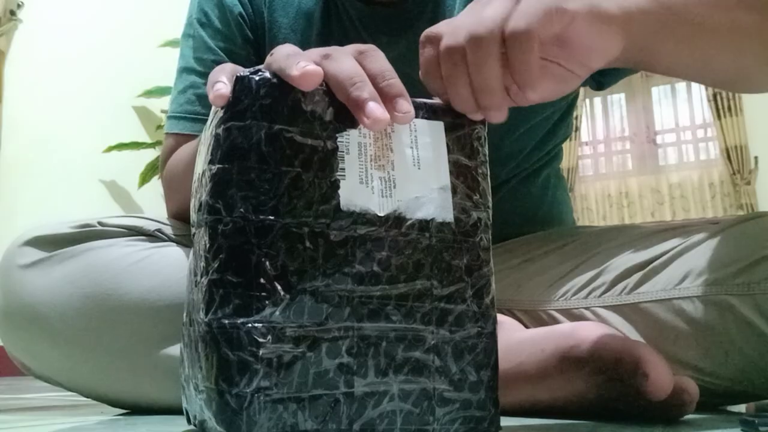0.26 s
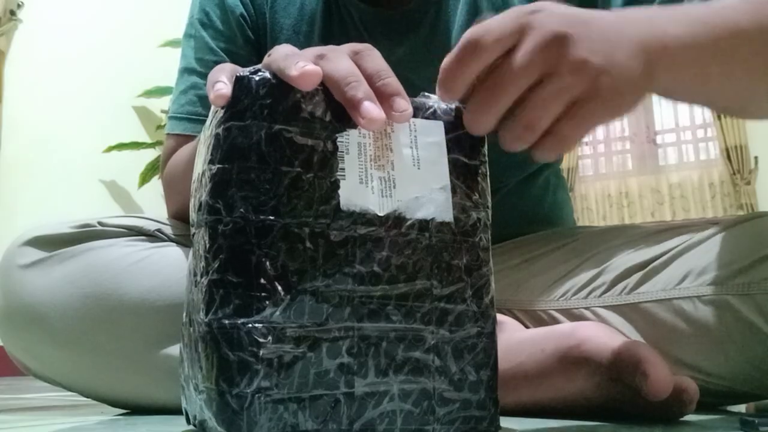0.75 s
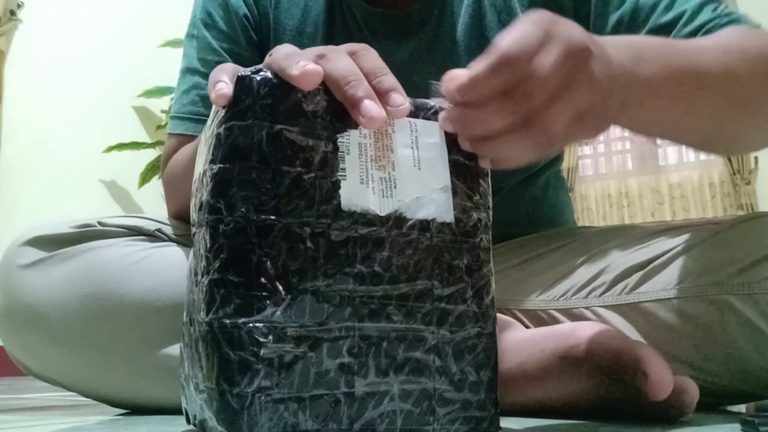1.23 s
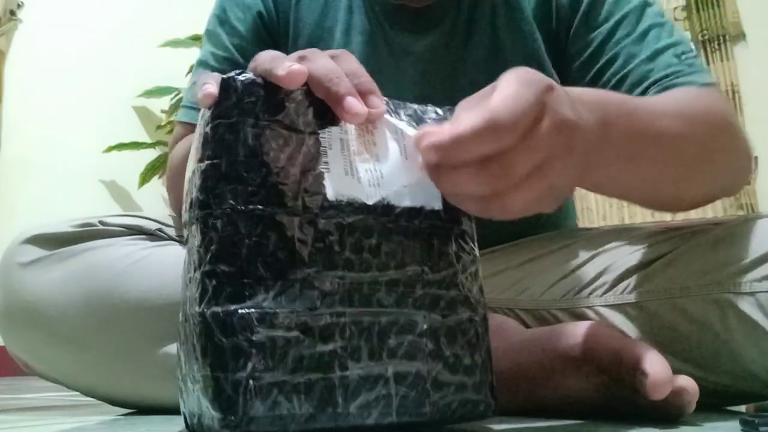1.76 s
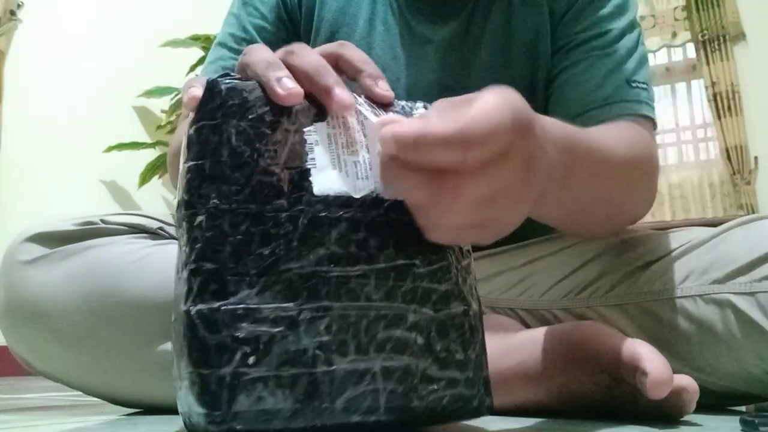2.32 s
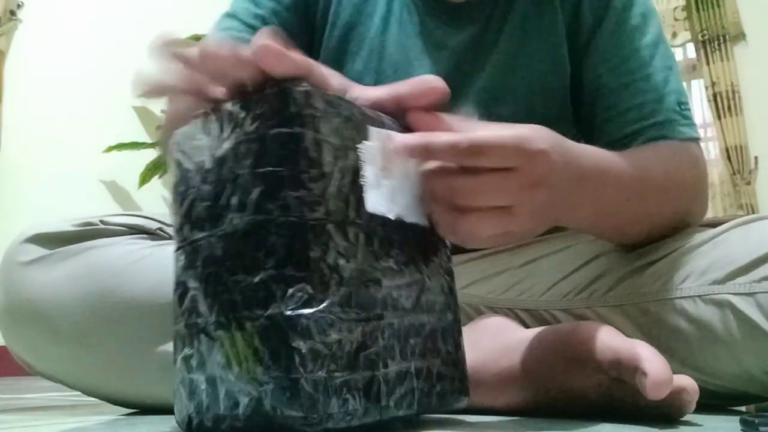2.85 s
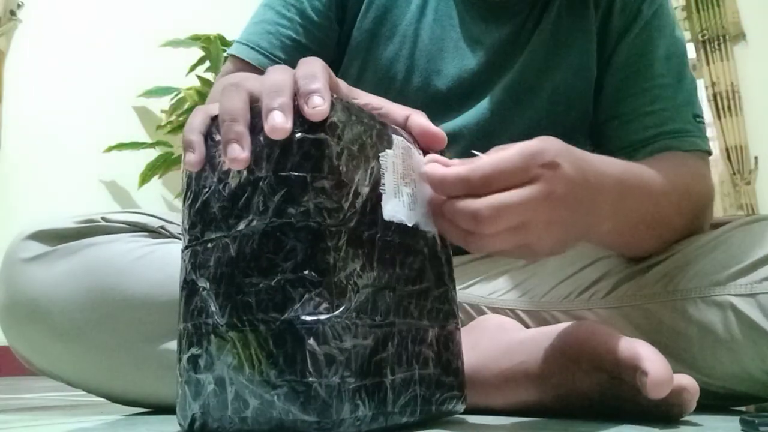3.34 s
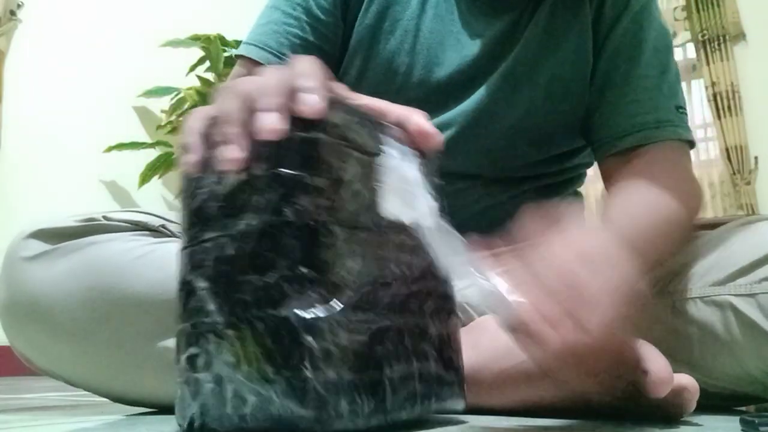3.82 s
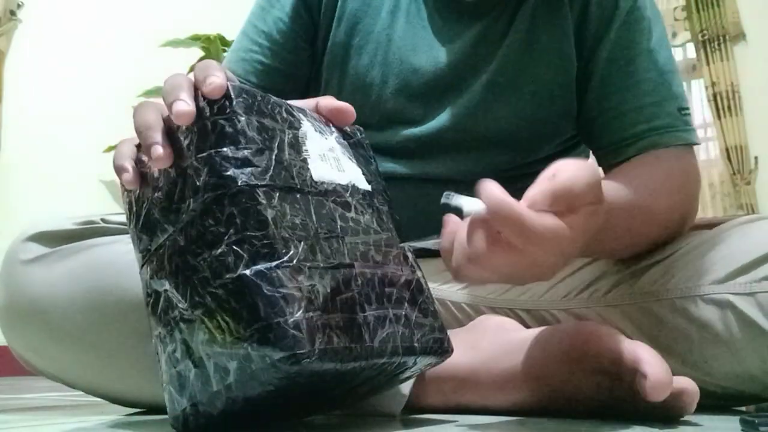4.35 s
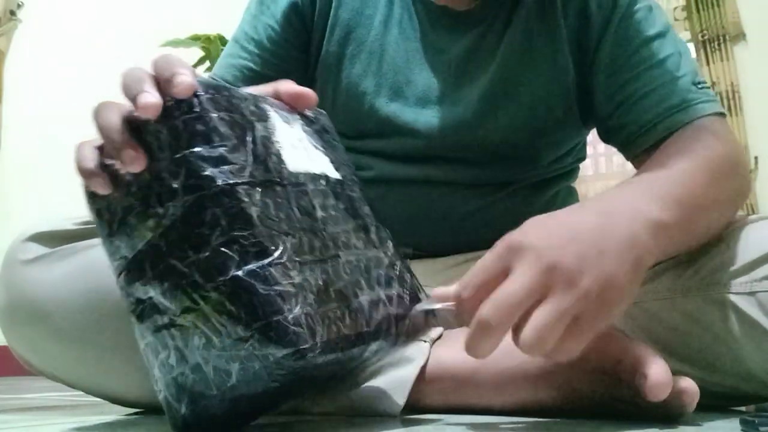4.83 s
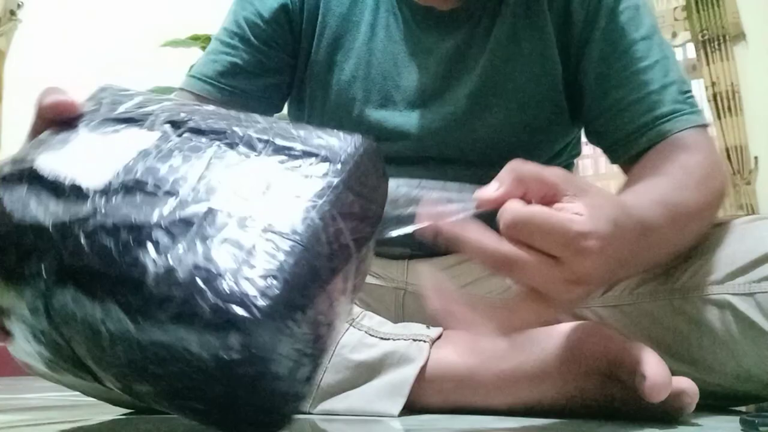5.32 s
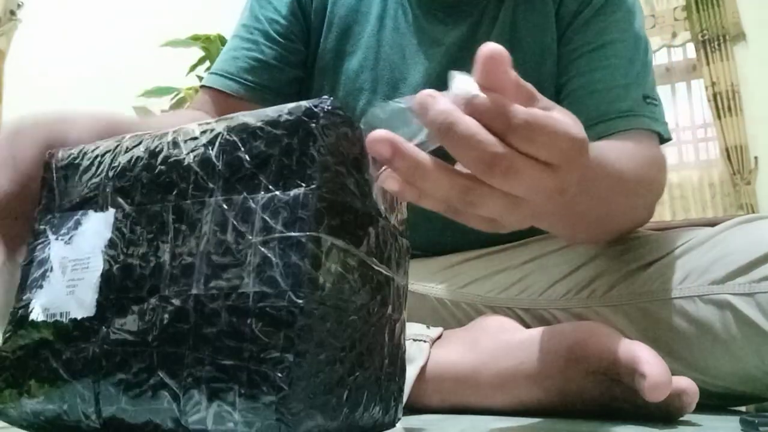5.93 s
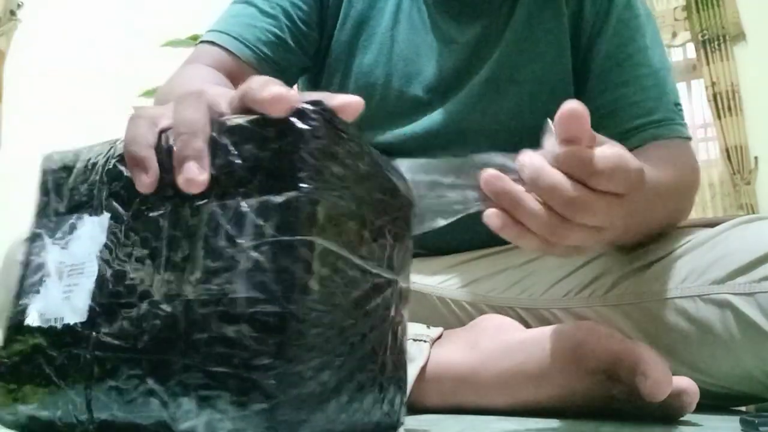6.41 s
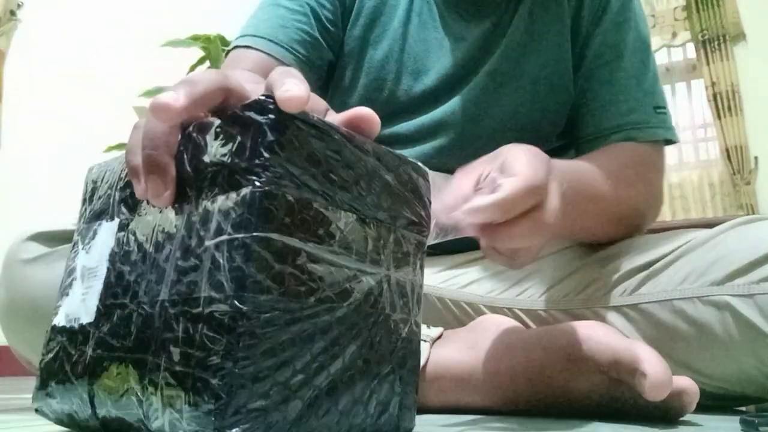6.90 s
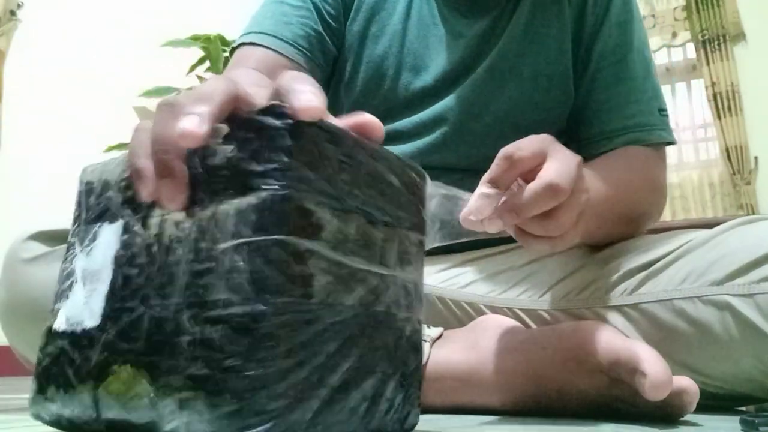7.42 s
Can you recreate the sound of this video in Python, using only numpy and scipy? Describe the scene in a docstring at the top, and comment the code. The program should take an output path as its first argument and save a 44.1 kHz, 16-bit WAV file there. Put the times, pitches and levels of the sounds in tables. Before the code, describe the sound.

A parcel wrapped in plastic film is pulled open by hand. Quiet fumbling and isolated ticks come first, then a cluster of hard snaps, a quieter stretch of rustle, a quick tape rip and a rapid stuttering run of loud cracks. Later snaps sound thicker and more crackly, with boxy thumps and a final bright rip. Close phone microphone, small reverberant room, faint low background between pulls.

```python
"""Packing tape pulled off a plastic-wrapped parcel lets go in sharp stick-slip snaps and fast rips.
Snaps are click trains through ringing film; rips are dense clicks shaped by the taut strip's resonance.
The film crinkles under the fingers (flurries of clicks), hands rub on the box, and its walls knock
hollowly (damped tones with a band of noise). A small hard-walled room adds decaying noise echoes.
A phone close by holds the loudest snaps down and hushes the pauses."""
import sys
import numpy as np
from scipy import signal
from scipy.fft import rfft, irfft
from scipy.io import wavfile
from scipy.ndimage import uniform_filter1d, minimum_filter1d

SR = 44100
rng = np.random.default_rng(int(sys.argv[2]) if len(sys.argv) > 2 else 0)


def output_pcm(signal):
    """Save a mono or channel-first signal as 16-bit PCM at the path in sys.argv[1].

    Samples are clipped to [-1, 1] before scaling.
    """
    pcm = np.clip(np.atleast_2d(signal).T, -1, 1) * 32767
    wavfile.write(sys.argv[1], SR, np.round(pcm).astype(np.int16))


N = 337802
TIME = np.arange(N) / SR  # s

# movements of the hands; start_s is when full effort is reached:
# start_s, length_s, crinkle_db, rub_db
HAND_MOVES = [(0.132, 0.24, -57, -66.5), (0.485, 0.18, -71, -60.5), (0.717, 0.018, -39, -50),
              (1.086, 0.069, -40, -54), (1.22, 0.56, -50.5, -57.5), (1.886, 0.36, -47.5, -49.5),
              (2.345, 0.15, -48.5, -60), (2.493, 0.058, -43.5, -42), (2.6, .3, -49, -56.5),
              (2.778, 0.049, -49, -55), (2.989, 0.082, -43, -37.5), (3.28, 0.81, -50, -56.5),
              (3.86, 0.38, -51, -51.5), (4.356, 0.0083, -30, -45), (4.47, 0.56, -47, -40.5),
              (5.143, 0.22, -49, -46.5), (5.442, 0.453, -47, -50.5), (5.515, 0.044, -37, -56),
              (5.88, 0.036, -43, -48.5), (6.137, 0.038, -39.5, -39.5), (6.258, 0.32, -33.5, -38),
              (6.676, .12, -44.5, -52.5), (6.84, 0.068, -42.5, -42.5), (7.022, 0.24, -50.5, -53),
              (7.385, 0.22, -36, -34.5)]
# single snaps of tape or film: start_s, level_db, brightness_db_per_octave, slip_length_ms
SINGLE_SNAPS = [(0.471, -24, 0, 1.4), (0.531, -29, 2.5, 2.2), (0.731, -50, 7, 4.5), (1.013, -45.5, 0, 8.2),
                (1.124, -30.5, -1, 2), (1.136, -31.5, 5, 6.7), (1.207, -37, 4, 2), (1.317, -18, -0.5, 1.5),
                (1.346, -25, 2.5, 3.3), (1.369, -18.5, -1, 1.4), (1.404, -30.5, -0.5, 7.2),
                (1.522, -22.5, 3, 2.9), (1.602, -11.5, -2.5, 1.2), (1.673, -31, 6, 4.9),
                (1.787, -35.5, -11, 11), (1.876, -33.5, -10, 23), (1.903, -15, 0.5, 3.4),
                (2.125, -27.5, -9.5, 22.5), (2.506, -31.5, 2, 1.5), (2.554, -24, -6, 1),
                (3.209, -22.5, 1.5, 3.1), (4.161, -38.5, -4.5, 5.6), (4.218, -29.5, 1, 4),
                (4.283, -17, 1.5, 3), (4.38, -12, 0, 1.7), (4.403, -12.5, -3, 1.9), (4.545, -18, 2, 2.6),
                (4.647, -14.5, 0, 3.3), (4.759, -10, -5, 3.6), (4.783, -16.5, 5.5, 1.5),
                (5.13, -16.5, 1.5, 3.9), (5.235, -12.5, 0.5, 1), (5.282, -20, 0.5, 1.2),
                (5.567, -21.5, -2, 2.9), (5.636, -27, 3, 1.8), (6.057, -40.5, -3.5, 11),
                (6.177, -18.5, 1, 7.3), (6.315, -18.5, -0.5, 2.9), (6.347, -20, 1, 2.6),
                (6.361, -16.5, 1.5, 17), (6.412, -14.5, 2.5, 6.3), (6.456, -18.5, -1, 10.5),
                (6.559, -21.5, 0.5, 8.1), (6.607, -15.5, -2, 1.5), (6.755, -33, 4.5, 1.5),
                (6.839, -36, 3, 2.6), (6.941, -22, -1.5, 3.4), (7.179, -14, -0.5, 5.1),
                (7.306, -16.5, 0.5, 6.5), (7.644, -17, -0.5, 7.4)]
# runs of snaps at a nearly even pace, with their mean level and brightness:
# first_s, last_s, pace_per_s, level_db, brightness_db_per_octave, slip_length_ms
STUTTER_RUNS = [(1.351, 1.359, 230, -17, -2.5, 1.9), (3.01, 3.019, 110, -21, 1.5, 2.4),
                (3.044, 3.055, 85, -19, -2, 2.3), (4.419, 4.441, 135, -14.5, -1.5, 3.7),
                (4.484, 4.525, 100, -11.5, -1.5, 3.5), (4.561, 4.618, 90, -15, -1.5, 1.6),
                (4.667, 4.675, 100, -15, 0.5, 4.8), (4.712, 4.729, 62, -14, -4.5, 2.4),
                (4.813, 4.83, 55, -12.5, -2, 5.6), (4.867, 4.878, 77, -14, 0, 5.5),
                (4.92, 4.962, 125, -17.5, 1.5, 6), (4.963, 4.988, 55, -14, -3.5, 1.4),
                (5.023, 5.039, 70, -15.5, 0.5, 1.6), (6.207, 6.278, 56, -16, 0.5, 10.3),
                (6.484, 6.527, 48, -18.5, -0.5, 6.1), (7.351, 7.383, 95, -16, 0.5, 5.3),
                (7.501, 7.525, 77, -18.5, -0.5, 2.3)]
# the freed strip of tape as its length changes; the gain is over a plain snap:
# time_s, resonance_hz, resonance_db
STRIP_STATES = [(1.36, 1720, 0.5), (3.1, 4500, -11), (3.82, 2000, -13), (4.5, 3102, -30), (6.25, 2740, 1.5),
                (7.18, 1120, -18), (7.43, 4140, -22)]
# box walls flexing and bumping: start_s, level_db, pitch_hz, t60_s
BOX_KNOCKS = [(1.139, -40, 322, 0.043), (1.229, -42, 380, 0.036), (1.723, -32.5, 317, 0.064),
              (1.877, -31, 333, 0.2), (1.906, -14.5, 1243, 0.024), (2.124, -27, 469, 0.13),
              (2.133, -29.5, 370, 0.11), (2.554, -25, 362, 0.021), (2.796, -44, 310, .09),
              (2.998, -24.5, 340, 0.089), (4.919, -20.5, 800, 0.11), (4.954, -25, 610, 0.42),
              (5.235, -29.5, 365, 0.096), (6.941, -16.5, 840, 0.027), (7.128, -29.5, 292, 0.045),
              (7.179, -15, 1092, 0.048), (7.352, -11.5, 1110, 0.09), (6.151, -40, 101, 0.087),
              (7.378, -26.5, 96, 0.076), (7.38, -26, 170, 0.079), (7.385, -23, 337, 0.17)]
# tape peeling off, one list of points per run; the bands part near 3 kHz:
# time_s, low_band_db, high_band_db
PEEL_RUNS = [
    [(3.25, -91, -51.5), (3.75, -39, -52.5)],
    [(3.775, -30.5, -42), (3.8, -19.5, -27.5), (3.82, -12, -24.5), (3.852, -21, -20.5), (3.872, -20, -24.5)],
    [(7.38, -30, -20.5), (7.425, -24, -20.5), (7.47, -17.5, -19.5), (7.494, -28, -26)],
]
# spectrum of the snapping film: frequency_hz, level_db
FILM_SPECTRUM = [(30, -45), (110, -33), (220, -27.5), (360, -17), (700, -6), (1200, -2), (2200, 1),
                 (3500, -3.5), (5200, -7), (7000, -11.5), (16000, -21.5)]
# spectrum of creasing film and creeping glue: frequency_hz, level_db
CRINKLE_SPECTRUM = [(400, -7), (1200, 5.5), (2400, 5), (5000, -1.5), (7000, -8), (16000, -17)]
# spectrum of the box when rubbed or tugged: frequency_hz, level_db
BOX_SPECTRUM = [(30, -29), (105, -13), (210, 0), (360, 4.5), (700, -3.5), (1300, -9.5), (3000, -26)]
# spectrum of the faint background: frequency_hz, level_db
BACKGROUND_SPECTRUM = [(25, 0), (60, -23), (100, 13), (160, 0), (600, -23.5), (16000, -20)]
# response of the phone's microphone port: frequency_hz, gain_db
MICROPHONE_RESPONSE = [(1130, -1), (1270, 6), (1420, -4.5), (1900, 0.5), (6800, 4), (8000, -10.5),
                       (9400, -4), (13600, -6.5), (14600, 5), (15500, 2), (15900, -51)]

MOVE_ATTACK_SHARE, MOVE_RELEASE_SHARE = 0.18, 0.28  # of a movement's length
REST_CRINKLE_DB, REST_RUB_DB = -67, -80  # hands lying still on the parcel
STUTTER_EASE_DB = 1  # the pull eases by this from first snap to last
STUTTER_SCATTER_DB, STUTTER_TILT_SCATTER_DB = 1.76, 2.0  # spread of level; of brightness per octave
STUTTER_JITTER = 0.08  # unevenness of the pace, as a share of the gap
BOX_TUG_DB = -16  # each snap tugs on the box wall
ROOM_T60_S, ROOM_TREBLE_T60_S = 0.59, 0.66
TOP_HZ = 15700  # upper end of the phone's range


def undb(db):
    """Amplitude ratio from its logarithm: decibels to gain."""
    return 10 ** (np.asarray(db) / 20)


def unit(x):
    """Normalisation by effective value: scale to an rms of one."""
    return x / np.sqrt(np.mean(x ** 2) + 1e-18)


def add(out, s, sound):
    """Superposition: mix a sound in at time s."""
    i = max(int(s * SR), 0)
    out[i:i + len(sound)] += sound[:max(len(out) - i, 0)]


def colour(x, points, tilt_db=0, size=2048):
    """Minimum-phase filtering: a causal response through (Hz, dB) points, tilted about 2500 Hz."""
    hz, db = np.transpose(points)
    f = np.maximum(np.arange(size // 2 + 1) * SR / size, 1)
    octaves = np.log2(np.clip(f, 900, 7000) / 2500)
    response_db = np.interp(np.log(f), np.log(hz), db) + tilt_db * octaves
    # folding the cepstrum onto positive times makes the response causal
    cepstrum = irfft(np.log(undb(response_db)))
    cepstrum[1:size // 2] *= 2
    cepstrum[size // 2 + 1:] = 0
    impulse = irfft(np.exp(rfft(cepstrum)))
    return signal.fftconvolve(x, impulse)[:len(x)]


def split(x, hz):
    """Band division: the parts below and above a frequency."""
    filters = [signal.butter(4, hz, kind, fs=SR, output="sos") for kind in ("low", "high")]
    return [signal.sosfilt(sos, x) for sos in filters]


def ring(t60, size=2048):
    """Modal overlap: many close, damped modes, as decaying noise of unit energy."""
    x = rng.standard_normal(size) * np.exp(-np.log(1000) * TIME[:size] / t60)
    return x / np.linalg.norm(x)


def clicks(per_s, spread_db):
    """Random impulse train: sizes scatter exponentially in decibels, capped at a factor of eight."""
    size = np.minimum(undb(spread_db * rng.exponential(size=N)), 8)
    return (rng.random(N) < per_s / SR) * size * rng.choice([-1, 1], N)


def walk(per_s):
    """Smoothed randomness: a wander with an rms of one."""
    step = int(SR / per_s)
    held = np.repeat(rng.standard_normal(N // step + 1), step)[:N]
    return unit(uniform_filter1d(held, step))


def background():
    """Stationary noise: a faint, steady background with a shaped spectrum."""
    return undb(-61.0) * unit(colour(rng.standard_normal(N), BACKGROUND_SPECTRUM))


def hand_effort():
    """Addition of powers: each movement swells, holds and dies away, giving crinkle and rub gains."""
    power = undb([[REST_CRINKLE_DB], [REST_RUB_DB]]) ** 2
    for start, length, *levels_db in HAND_MOVES:
        # long movements start and stop gently
        corners = start + length * np.array([-MOVE_ATTACK_SHARE, 0, 1, 1 + MOVE_RELEASE_SHARE])
        swell = np.interp(TIME, corners, [0, 1, 1, 0])
        power = power + np.outer(undb(levels_db), swell) ** 2
    return np.sqrt(power)


def flurries(x):
    """Amplitude modulation: the level wanders by a few decibels many times a second."""
    return unit(x * undb(3 * walk(per_s=40)))


def handling(count=4):
    """Crease buckling and friction: folds flip, glue fizzes as it creeps, hands and tape drag on the box."""
    crinkle, rub = hand_effort()
    folds = [signal.fftconvolve(clicks(per_s=35, spread_db=7.0), ring(t60=0.0067))[:N]
             for _ in range(count)]
    creases = flurries(colour(sum(folds), CRINKLE_SPECTRUM))
    glue = unit(colour(clicks(per_s=3500, spread_db=-2.0), CRINKLE_SPECTRUM))
    film = undb(-2.5) * creases + undb(-8) * glue
    box = flurries(colour(clicks(per_s=900, spread_db=2.5), BOX_SPECTRUM))
    return film * crinkle + box * rub


def strip(x, hz, db, quality=1.2):
    """Resonance under tension: add the peak of the taut strip."""
    return x + undb(db) * signal.lfilter(*signal.iirpeak(hz, quality, fs=SR), x)


def strip_state(s):
    """Changing length: resonance (Hz) and its level (dB) at time s."""
    strip_s, *columns = np.transpose(STRIP_STATES)
    return [np.interp(s, strip_s, column) for column in columns]


def snap(tilt_db, length_ms, strip_hz, strip_db, box_db, slip_db, slip_gap_ms, count=20):
    """Stick-slip release: the glue cracks and may slip again. Returns direct and all-round sound."""
    film = undb(-2) * ring(t60=0.015) + undb(-9.0) * ring(t60=0.037)
    film[0] += 1
    later_ms = np.cumsum(slip_gap_ms * rng.uniform(.5, 2, count))
    strength = undb(slip_db + 2 * rng.standard_normal(count)) * rng.choice([-1, 1], count)
    strength *= np.clip(length_ms - later_ms - 1, 0, 1)  # the slips end within the snap's length
    slips = film.copy()
    for ms, gain in zip(later_ms, strength):
        add(slips, ms / 1000, gain * film)
    # the film's ripples differ with direction, so the walls receive a smooth spectrum
    sources = (slips, signal.unit_impulse(len(slips)))
    pair = np.array([unit(strip(colour(x, FILM_SPECTRUM, tilt_db), strip_hz, strip_db))
                     for x in sources])
    pair += undb(box_db) * unit(colour(ring(t60=0.073), BOX_SPECTRUM))
    # the level refers to the rms of the direct sound's attack
    attack = int((max(length_ms, 1) + 1.5) * SR / 1000)
    return pair / np.sqrt(np.mean(pair[0, :attack] ** 2))


def stutters():
    """Relaxation oscillation: tension builds and lets go repeatedly, weakening on average.

    Yields one row per snap, with the columns of SINGLE_SNAPS."""
    for first_s, last_s, per_s, db, tilt_db, length_ms in STUTTER_RUNS:
        gaps = max(round((last_s - first_s) * per_s), 1)
        for k, (late, loud, bright) in enumerate(rng.standard_normal((gaps + 1, 3))):
            progress = k / gaps
            s = first_s + progress * (last_s - first_s)
            s += (0 < k < gaps) * late * STUTTER_JITTER / per_s  # the end snaps stay in place
            level_db = db + STUTTER_EASE_DB * (.5 - progress) + STUTTER_SCATTER_DB * loud
            yield s, level_db, tilt_db + STUTTER_TILT_SCATTER_DB * bright, length_ms


def snaps():
    """Independent radiators: every snap comes from another patch of film, so each has its own ring."""
    direct, all_round = np.zeros(N), np.zeros(N)
    for s, db, tilt_db, length_ms in [*SINGLE_SNAPS, *stutters()]:
        near, wide = undb(db) * snap(tilt_db, length_ms, *strip_state(s), BOX_TUG_DB,
                                     slip_db=-6.0, slip_gap_ms=1.0)
        add(direct, s, near)
        add(all_round, s, wide)
    return direct, all_round


def knocks(width=0.27, size=8192):
    """Panel vibration: cardboard swings at its own pitch, with a dull rattle of neighbouring modes."""
    out, t = np.zeros(N), TIME[:size]
    for s, db, hz, t60 in BOX_KNOCKS:
        panel = np.sin(2 * np.pi * hz * t) * np.exp(-np.log(1000) * t / t60)
        edges_hz = [hz / (1 + width), hz * (1 + width)]
        band = signal.butter(2, edges_hz, "band", fs=SR, output="sos")
        rattle = unit(signal.sosfilt(band, ring(t60, size=size)))
        add(out, s, undb(db) * (panel + undb(1.5) * rattle * panel.std()))
    return out


def rips(fade_s=0.01):
    """Rapid stick-slip: pulled steadily, the tape slips thousands of times a second, heard as a rasp."""
    slips = colour(clicks(per_s=7000, spread_db=3.2), FILM_SPECTRUM)
    out = np.zeros(N)
    for rip in PEEL_RUNS:
        s, low_db, high_db = np.transpose(rip)
        strip_hz, strip_db = strip_state(s.mean())
        # the strip rings more strongly and sharply than in a snap
        rasp = strip(slips, strip_hz, strip_db + 6, quality=4.1)
        low, high = map(unit, split(rasp, 2670))
        low = low * undb(np.interp(TIME, s, low_db))
        high = high * undb(np.interp(TIME, s, high_db))
        gate = np.interp(TIME, [s[0] - fade_s, s[0], s[-1], s[-1] + fade_s], [0, 1, 1, 0])
        out += gate * (low + high)
    return out


def echoes(late_db, size=36000):
    """Reflection and reverberation: floor and nearby things answer early; bare walls add a longer tail."""
    early = undb(-10) * ring(t60=.06, size=size) * (TIME[:size] > .004)
    tail = split(ring(ROOM_T60_S, size=size), 3090)[0]
    tail = tail + split(ring(ROOM_TREBLE_T60_S, size=size), 3980)[1]
    return early + undb(late_db) * tail * np.clip(TIME[:size] / 0.0095, 0, 1)


def room(x, count=12):
    """Time-varying reflection: as hands and parcel move, one echo pattern gives way to the next."""
    out = np.zeros(N)
    for k in range(count):
        distance = np.abs(np.linspace(0, count - 1, N) - k)
        share = np.sqrt(np.clip(1 - distance, 0, 1))  # equal-power crossfade
        out += signal.oaconvolve(x * share, echoes(late_db=-9.0))[:N]
    return out


def scene():
    """Superposition of sources: the parcel, its echoes alone, and a faint background."""
    direct, all_round = snaps()
    rest = rips() + handling() + knocks()
    return (direct + rest + room(all_round + rest) + background())[None]


def limit(x, ceiling, size):
    """Peak limiting: the gain dips around each peak that would pass the ceiling."""
    gain = np.minimum(1, ceiling / (np.abs(x) + 1e-9))
    return x * uniform_filter1d(minimum_filter1d(gain, size), size)


def suppress(x, threshold_db, depth_db, size=2200):
    """Downward expansion: noise suppression turns the quietest moments down further."""
    level_db = 10 * np.log10(np.abs(uniform_filter1d(x ** 2, size)) + 1e-12)
    return x * undb(np.clip(level_db - threshold_db, -abs(depth_db), 0))


def hush(x, cross_hz=600):
    """Band-limited expansion: the suppressor works on the hiss and lets the low rumble through."""
    low = signal.sosfiltfilt(signal.butter(2, cross_hz, fs=SR, output="sos"), x)
    return low + suppress(x - low, threshold_db=-53, depth_db=13)


def record(dry):
    """Transduction: the microphone port colours, peaks are held, pauses hushed, both range ends cut."""
    held = limit(colour(dry[0], MICROPHONE_RESPONSE), ceiling=.84, size=130)
    hushed = hush(held)
    thinned = signal.sosfilt(signal.butter(3, 52, "high", fs=SR, output="sos"), hushed)
    return signal.sosfilt(signal.ellip(8, .2, 70, TOP_HZ, fs=SR, output="sos"), thinned)[None]


dry = scene()
out = record(dry)
output_pcm(out)
```